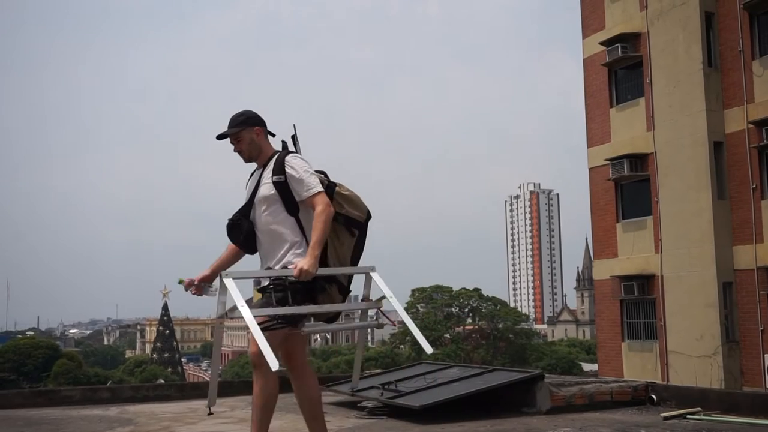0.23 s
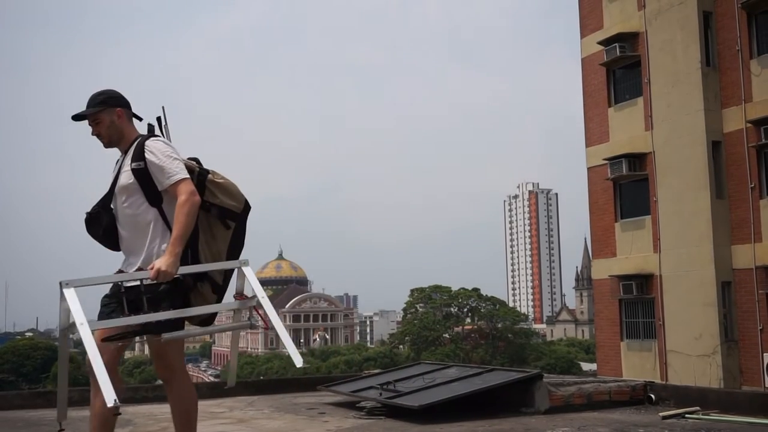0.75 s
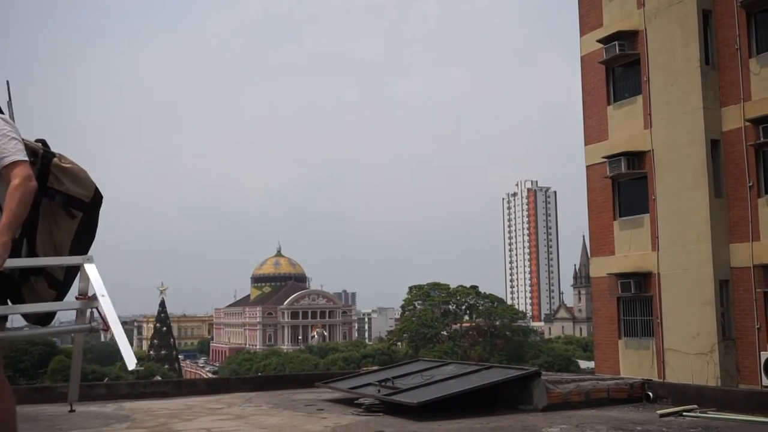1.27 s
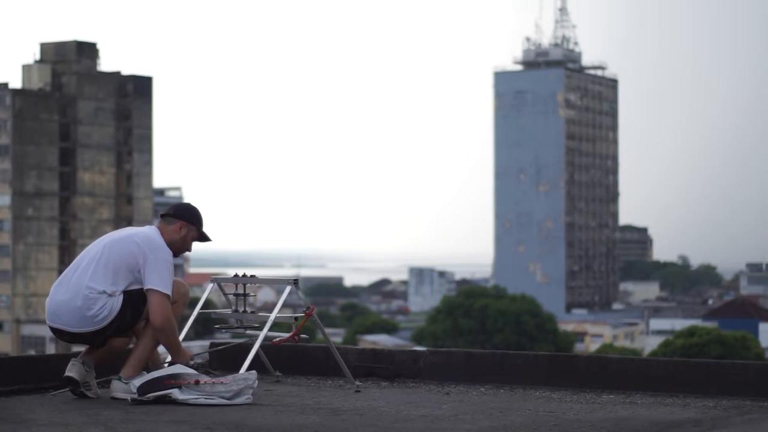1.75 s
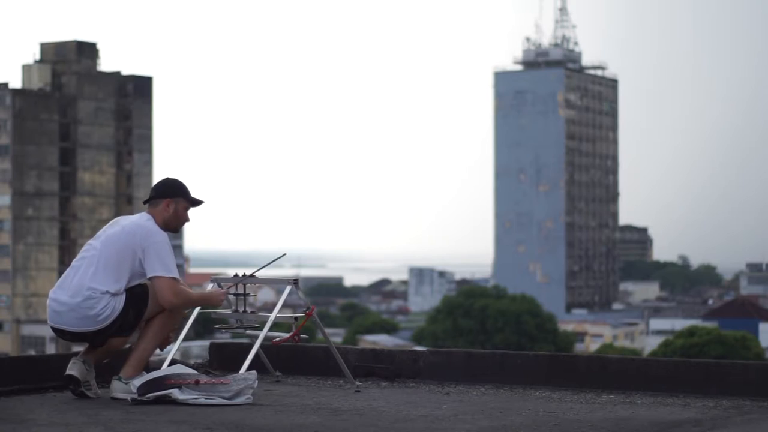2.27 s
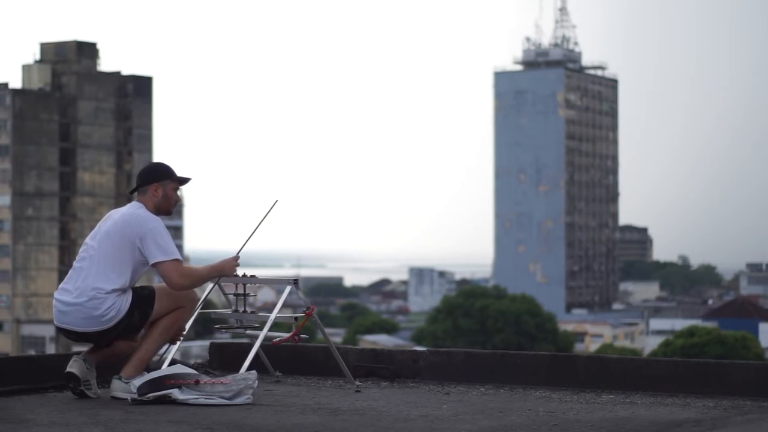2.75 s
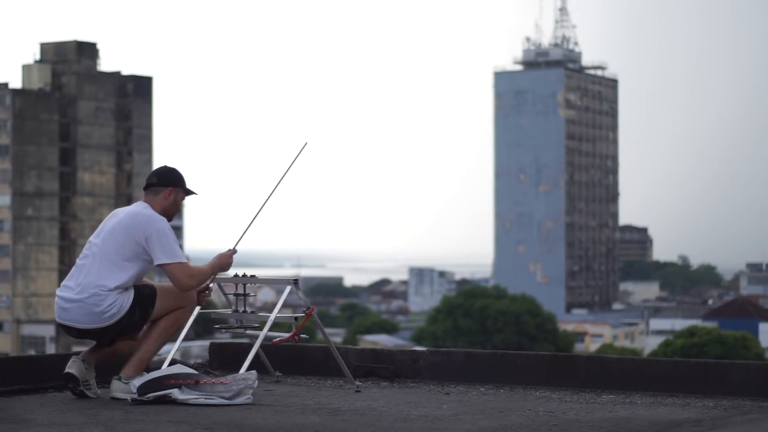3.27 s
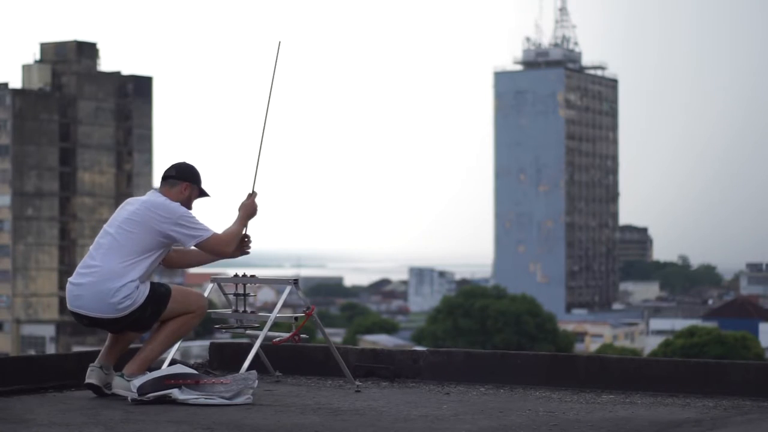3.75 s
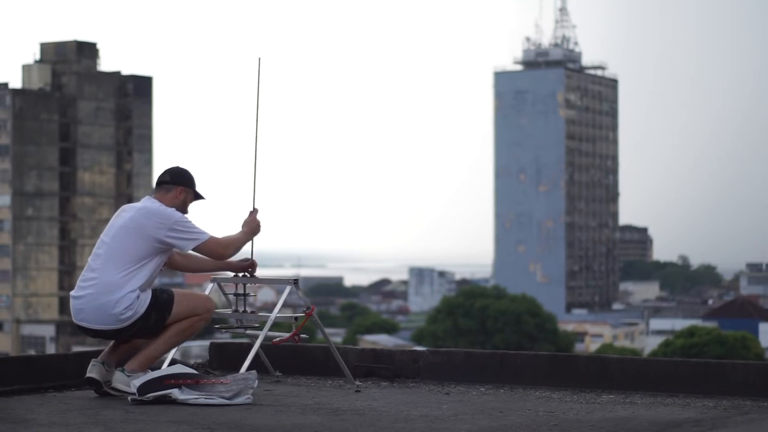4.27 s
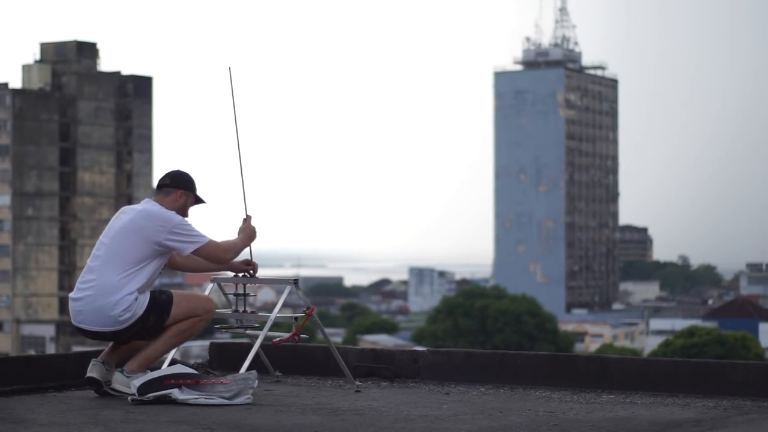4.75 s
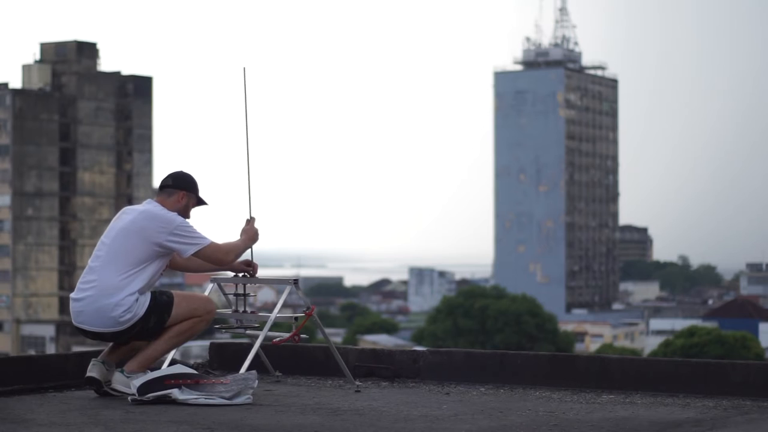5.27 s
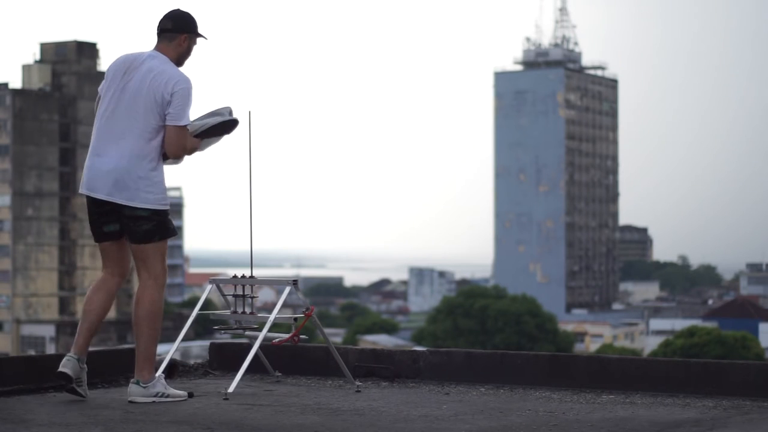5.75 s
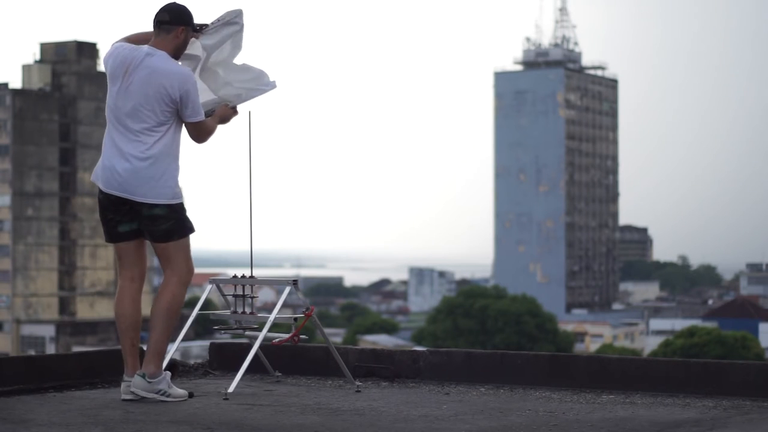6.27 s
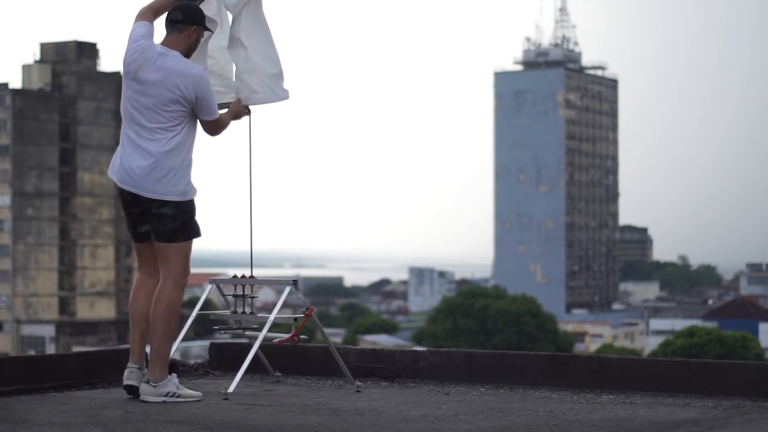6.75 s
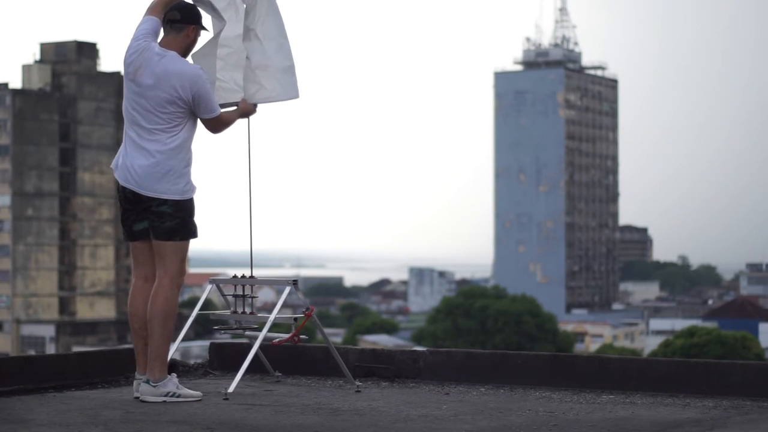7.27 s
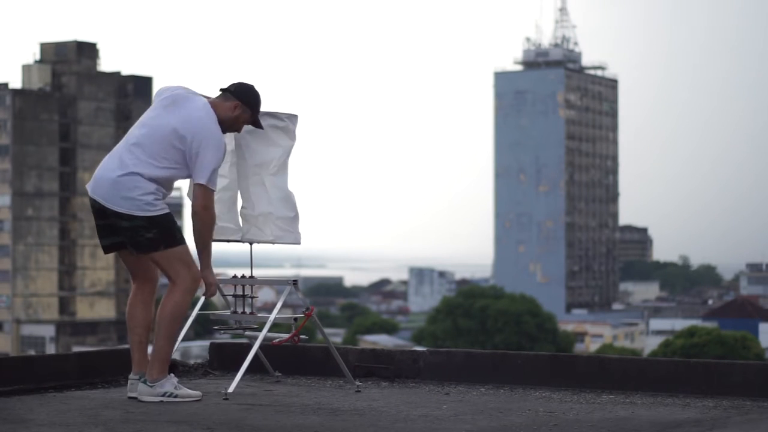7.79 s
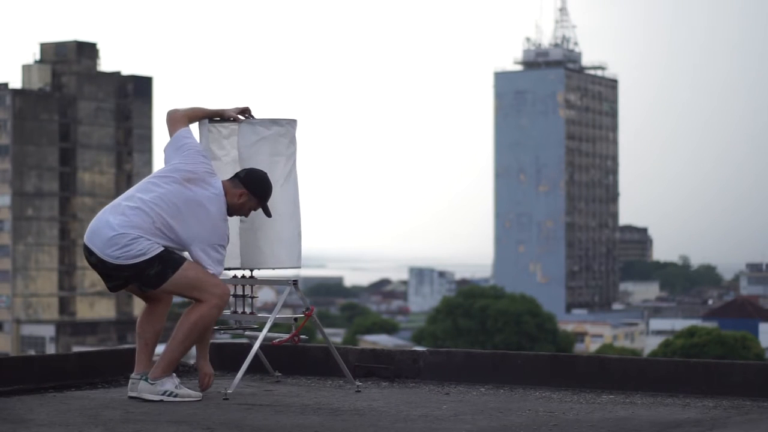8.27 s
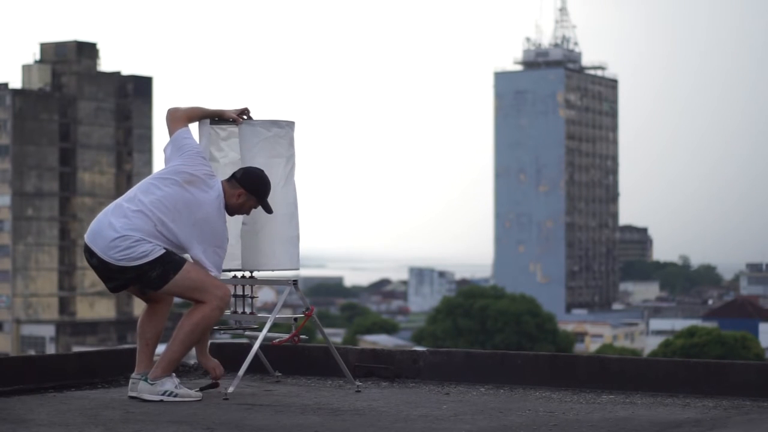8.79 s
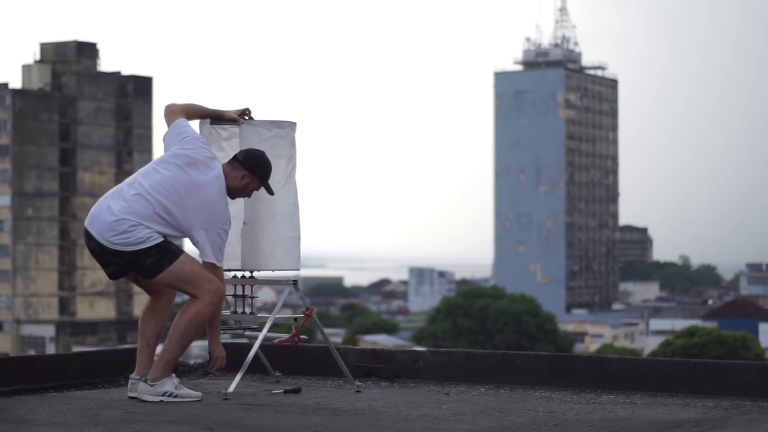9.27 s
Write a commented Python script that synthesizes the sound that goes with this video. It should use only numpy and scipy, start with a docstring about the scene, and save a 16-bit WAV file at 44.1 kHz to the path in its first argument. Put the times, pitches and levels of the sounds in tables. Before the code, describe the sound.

Rooftop ambience over a busy street: bus pulling away, heavy engine idling, soft tyre wash, while handled gear ticks, knocks and jingles nearby.

```python
"""City traffic from a rooftop

Two microphones set apart hear deep rumble, a bus pulling away, a heavy engine idling and revving, a low hum,
passing tyres and rubbing brakes. Close by, handled gear ticks, scuffs, knocks and jingles; thin tones come and go.
Engines are sums of sine waves; traffic, brakes and scuffs are shaped noise. Ticks are dying noise bursts,
and knocked frames and struck metal ring at their own pitches."""
import sys
import numpy as np
from scipy import signal
from scipy.fft import rfft, irfft, next_fast_len
from scipy.io import wavfile
from scipy.ndimage import uniform_filter1d

SR = 44100
rng = np.random.default_rng(int(sys.argv[2]) if len(sys.argv) > 2 else 0)


def transcribe(u):
    """Save the signal u as a 16-bit wav file named by the first command-line argument.

    u: samples, shape (n,) or (channels, n), limited to [-1, 1]; the rate is SR.
    q: integer samples, one column per channel.
    """
    v = np.clip(np.atleast_2d(u).T, -1, 1)
    q = np.round(v * 32767).astype(np.int16)
    wavfile.write(sys.argv[1], SR, q)


N = 420273
TIME = np.arange(N) / SR
# Every table of a noise's spectrum gives only its shape: the noise is scaled to rms 1 afterwards.


# bus pulling away through its gears: (time [s], firing rate [Hz], level [dB])
BUS = [(.25, 46.47, -42), (.45, 56.5, -30.5), (.68, 64.8, -32), (.89, 74.45, -24), (1.05, 79.4, -29.5),
       (1.3, 83.6, -33), (1.42, 76.35, -24.5), (1.75, 84.55, -30.5), (1.9, 88.7, -23.5), (2.4, 93, -30),
       (2.58, 92.8, -37.5), (2.8, 93.2, -25.5), (2.97, 95, -36.5), (3.13, 94.8, -27), (3.43, 94.2, -35.5),
       (3.58, 91, -27.5), (3.8, 91.05, -45), (4.0, 90, -31.5)]


def bus():
    """The firing rate climbs through the gears; a faint second multiple grows while the engine speeds up."""
    hz, first_db, gate = in_time(BUS)
    second_db = first_db - 25 + 0.3521 * speeding_up(hz)     # 0.3521 dB for each Hz per second
    return gate * engine(hz, (1, 2), (first_db, second_db))


# heavy engine: (time [s], firing rate [Hz], level [dB], level of the second multiple [dB])
LORRY = [(0, 27.9, -34.5, -42), (.6, 27.87, -30, -31.5), (1.2, 28.1, -31.5, -47), (3.0, 27.91, -31, -34.5),
         (3.65, 26, -30, -31.5), (4.2, 25.92, -21.5, -29), (4.8, 26.32, -25, -28.5),
         (5.2, 27.65, -27.5, -27.5), (5.9, 31, -24, -32), (6.15, 30.9, -23.5, -36), (6.35, 29.69, -39, -34),
         (7.0, 28.28, -29, -30.5), (7.3, 28.61, -38, -26), (7.75, 28.4, -28.5, -26),
         (8.1, 28.1, -29, -36.5), (8.7, 27.92, -30.5, -36), (9.1, 27.78, -33.5, -30),
         (9.53, 27.8, -31, -36)]


def lorry():
    """A heavy engine idles and revs; its sixth multiple lies under the second and grows while it speeds up."""
    hz, first_db, second_db, _ = in_time(LORRY)
    sixth_db = second_db - 19.5 + 1.5 * speeding_up(hz)     # 1.5 dB for each Hz per second
    return engine(hz, (1, 2, 6), (first_db, second_db, sixth_db))


THROB_DB, THROB_HZ = 1.8, 3.0     # how strongly and about how often an engine multiple swells


def engine(hz, multiples, levels_db):
    """Low multiples of the firing rate carry furthest, as near sines; uneven running lets the phase wander."""
    turns = 2 * np.pi * np.cumsum(hz) / SR + 0.0024 * wander(count=1)[0]
    out = np.zeros(N)
    for k, level_db in zip(multiples, levels_db):
        throb = narrow_noise(THROB_HZ, THROB_HZ)[0]     # swells and sinks at random on its way up
        gain = np.sqrt(2) * from_db(level_db + THROB_DB * throb)
        out += gain * np.sin(k * turns + rng.uniform(0, 2 * np.pi))
    return out


def speeding_up(hz):
    """Rise of the firing rate in Hz per second, smoothed; slowing down counts as none."""
    return np.clip(uniform_filter1d(np.gradient(hz) * SR, size=SR // 5), 0, None)


# loudness of the low hum: (time [s], level [dB])
HUM = [(0, -35.5), (1.4, -42.5), (3.3, -27), (4.0, -38), (5.1, -37.5), (5.5, -27), (6.4, -29), (8.2, -41.5),
       (9.25, -23.5), (9.53, -44)]


def hum():
    """Noise through a narrow low resonance makes a wavering hum."""
    return from_db(in_time(HUM)[0]) * narrow_noise(hz=40.62, width_hz=4.8)[0]


def engines():
    """Two engines and a hum; the bass reaches both microphones almost alike, 1 dB stronger on the left."""
    return (bus() + lorry() + hum()) * from_db([[.5], [-.5]])


# deep rumble, its spectrum: (frequency [Hz], level per Hz [dB])
RUMBLE = [(12, -29), (22, -3), (30, -3), (40, -3.5), (50, -1.5), (62, 3), (80, -4.5), (98, -8), (112, -11),
          (160, -50.5)]
# rise and fall of the rumble: (time [s], level [dB])
RUMBLE_LEVEL = [(0, -32.5), (.6, -28), (1.4, -31), (2.1, -27), (2.9, -30), (4.3, -29), (5.8, -31),
                (6.5, -27.5), (8.3, -30), (9.0, -30), (9.53, -26.5)]


def rumble():
    """Deep noise from all round rises and falls."""
    return from_db(in_time(RUMBLE_LEVEL)[0]) * coloured(RUMBLE)


# spectra of engine drone, tyre roar and tyre hiss: (frequency [Hz], level per Hz [dB])
DRONE = [(53, -29), (90, -8.5), (146, -4), (433, -16.5), (700, -29), (910, -62), (1540, -120)]
TYRES = [(300, -20), (600, -3), (900, -2), (1220, -1), (1500, -7.5), (1800, -25.5), (2400, -24)]
HISS = [(1300, -4), (1700, -5), (2300, -7), (3000, -14), (5000, -17), (6000, -27), (10000, -37.5),
        (13500, -62)]
# peaks added to the hiss: (frequency [Hz], width [Hz], height [dB])
HISS_PEAKS = [(2086, 450, 4.5), (3850, 270, 3), (5200, 89, -1.5)]


def passing_vehicles():
    """Drone and tyre noise swell as vehicles pass, coming partly from a street on the right."""
    drone, roar, hiss = passing_gains()
    low = drone * coloured(DRONE, side_share=0.41)
    tyres = roar * coloured(TYRES, side_share=0.56)
    return low + tyres + hiss * coloured(HISS, HISS_PEAKS, side_share=0.26)


# vehicles pass in the street: (time when closest [s], approach [s], departure [s],
#     engine drone level [dB], tyre roar level [dB], tyre hiss level [dB]); levels are for the closest moment
PASSES = [(0.1, .5, 0.74, -50.5, -61, -57), (5.15, 0.71, .4, -38.5, -44, -44.5),
          (6.6, 1, 0.86, -42, -50.5, -55), (8.7, 0.48, 1.4, -38.5, -43.5, -44)]
# loss as a power of 1 / distance: the treble goes first
DRONE_FADE, ROAR_FADE, HISS_FADE = 0.54, 0.94, 1.4


def passing_gains():
    """Each vehicle's distance grows before and after its closest moment; the powers of all vehicles add."""
    fades = np.array([[DRONE_FADE], [ROAR_FADE], [HISS_FADE]])
    power = 0
    for s, approach_s, departure_s, *levels_db in PASSES:
        pace_s = np.where(TIME < s, approach_s, departure_s)
        distance = np.hypot(1, (TIME - s) / pace_s)     # 1 when closest
        power = power + (from_db(levels_db)[:, None] / distance ** fades) ** 2
    return np.sqrt(power)


# brakes rub and a gear whines: (time [s], length [s], gear whine level [dB], brake whistle level [dB])
BRAKES = [(4.55, 1.0, -58, -75), (8.1, 1.08, -52, -68.5), (9.0, .9, -52, -72)]
# gear whine and brake whistle: (frequency [Hz], width [Hz])
BRAKE_BANDS = [(2170, 150), (7050, 190)]


def brakes():
    """Noise twice through each of two narrow resonances, louder on the right."""
    low, whistle = [narrow_noise(hz, width_hz, count=2) for hz, width_hz in BRAKE_BANDS]
    out = np.zeros((2, N))
    for s, length, low_db, whistle_db in BRAKES:
        out += stroke(s, length) * (from_db(low_db) * low + from_db(whistle_db) * whistle)
    return out * from_db([[-1.4], [1.4]])


# ticks of handled gear: (time [s], peak level before panning [dB], pitch of the knocked part [Hz],
#     left over right [dB])
TICKS = [(0.571, -44, 6000, -2), (0.6557, -47, 5000, -2), (.971, -37.5, 4200, 9), (1.0793, -32, 3100, .1),
         (1.086, -42, 5000, .1), (1.173, -40, 3200, -5), (1.1807, -43, 6500, -2), (1.678, -46, 4570, -.4),
         (1.746, -44, 3800, .9), (1.7932, -45, 5490, -3), (1.821, -48, 4800, 2), (3.5808, -25, 3073, 6),
         (7.051, -45, 9030, 5), (9.263, -40, 9000, 2)]
TICK_WIDTH, TICK_T60_S = 1.0, .005     # resonance width as a share of pitch; time for the burst to fall 60 dB


def ticks():
    """A tick is a dying burst of noise in the resonance of the knocked part."""
    out, t = np.zeros((2, N)), np.arange(1500) / SR
    for s, db, hz, pan_db in TICKS:
        noise = rng.standard_normal(len(t))
        noise[0] = 5.0     # the contact itself
        burst = noise * from_db(-60 * t / TICK_T60_S)
        tick = resonance(resonance(burst, hz, TICK_WIDTH * hz), hz, 1.1 * hz)
        damping = signal.butter(2, 1.5 * hz, fs=SR, output="sos")     # the far treble is damped
        tick = signal.sosfilt(damping, tick)
        add(out, s, from_db(db) * tick / np.abs(tick).max(), pan_db)
    return out


# scuffs of cloth or soles: (time [s], length [s], level [dB], left over right [dB])
SCUFFS = [(0.46, 0.023, -54, -1), (0.51, 0.028, -55, 0), (1.072, 0.023, -49, 0), (1.675, 0.021, -56, 0),
          (3.563, 0.043, -42.5, 3), (3.632, 0.026, -48.5, 5), (9.32, 0.0087, -45, 2)]
# their spectrum: (frequency [Hz], level per Hz [dB])
SCUFF = [(1200, 3), (2500, 10), (4000, 2), (6000, 1), (9000, -8.5), (13500, -7), (14600, -28)]


def scuffs():
    """A scuff is a short swell of bright noise."""
    out, rub = np.zeros((2, N)), coloured(SCUFF)
    for s, length, db, pan_db in SCUFFS:
        out += from_db(db + pan_db * np.array([[.5], [-.5]])) * stroke(s, length) * rub
    return out


# dull knocks on a hollow frame: (time [s], peak level [dB], frequency [Hz], width [Hz])
KNOCKS = [(1.1735, -36, 1280, 330), (1.181, -29.5, 1200, 420), (1.7877, -26.5, 1010, 620),
          (1.7917, -34.5, 2820, 500), (1.7932, -34, 734, 500), (1.8, -55, 2510, 600),
          (3.635, -42, 2300, 400), (3.646, -41, 2650, 400), (3.650, -43, 2423, 400),
          (7.158, -33, 1499, 593.5)]


def knocks():
    """A soft contact twice through the frame's resonance: a few rounded cycles."""
    out, contact = np.zeros((2, N)), np.eye(1, 1200)[0]
    for s, db, hz, width_hz in KNOCKS:
        knock = resonance(resonance(contact, hz, width_hz), hz, width_hz)
        add(out, s, from_db(db) * knock / np.abs(knock).max(), 0)
    return out


# small metal parts clink together: (time [s], strength [dB], pitch of the part struck hardest [Hz])
CLINKS = [(5.889, -51, 9750), (7.107, -32, 4800), (7.1085, -31, 3440), (7.110, -30, 8200),
          (7.112, -32, 13200), (7.145, -23, 11500), (7.157, -32, 7900), (7.158, -33, 4080),
          (7.163, -34, 2850), (7.170, -35, 14000), (7.212, -47, 11700), (7.257, -44, 12700),
          (7.312, -54, 9870), (8.449, -54, 14630), (9.396, -41, 9800), (9.407, -33, 4050),
          (9.428, -38, 13050), (9.444, -35, 3500), (9.447, -31, 4200), (9.448, -31, 11660),
          (9.449, -31, 7700), (9.457, -36, 13500), (9.476, -50, 11500)]
# ringing pitches (modes) of the parts: (frequency [Hz])
KEYS_HZ = [2850, 3440, 4080, 4800, 5500, 6350, 7080, 7596, 7960, 8860, 9790, 10670, 11660, 12720, 13780,
           14727]
# how each mode rings: (level [dB], time to fall 60 dB [s])
KEYS = [(-11, 0.2), (2.5, 0.053), (1.5, 0.086), (5, 0.051), (3.5, 0.037), (1, 0.021), (-10, 0.065),
        (-9, .07), (-7.5, 0.15), (-10, 0.053), (-7, 0.091), (-6.5, 0.063), (-4.5, 0.055), (-5, 0.03),
        (-5, .06), (-6, .05)]
AWAY_DB_PER_OCTAVE, AWAY_MOST_DB = 40, 24     # modes lose level with distance from the struck part


def clinks():
    """Each clink rings all the metal modes; those near the struck part speak loudest."""
    out, (mode_db, t60s) = np.zeros((2, N)), np.transpose(KEYS)
    for s, db, struck_hz in CLINKS:
        octaves = np.abs(np.log2(np.array(KEYS_HZ) / struck_hz))
        away_db = np.minimum(AWAY_DB_PER_OCTAVE * octaves, AWAY_MOST_DB)
        levels_db = db - 4 + mode_db - away_db + rng.normal(0, 2.5, len(t60s))
        struck(out, s, KEYS_HZ, levels_db, t60s, rise_s=.0005, pan_db=-4.6)
    return out


# rustle of many tiny metal contacts: (frequency [Hz], level per Hz [dB])
RUSTLE = [(1500, 8), (3000, 10), (5000, -11), (6300, -13), (8000, -15), (12000, 0.5), (15000, -11)]
CHATTER_PER_S, CHATTER_DB, CHATTER_T60_S = 700, -20.5, 0.18     # contacts, level under a clink, settling time


def chatter():
    """After each clink the parts chatter on, fainter, and settle: random clicks ring the modes over a rustle."""
    out, power = np.zeros((2, N)), np.zeros(N)
    for s, db, _ in CLINKS:
        settling_db = db + CHATTER_DB - 60 * np.abs(TIME - s) / CHATTER_T60_S
        power += (TIME > s) * from_db(settling_db) ** 2
    force = np.sqrt(power)
    for hz, (db, t60) in zip(KEYS_HZ, KEYS):
        contacts = rng.random(N) < CHATTER_PER_S / SR
        clicks = contacts * rng.standard_normal(N) * force + 1e-18
        width_hz = 5.6 / t60     # wide enough to ring shorter than a clink does
        ringing = from_db(db) * resonance(clicks, hz, width_hz) * SR / (2 * np.pi * width_hz)
        add(out, 0, ringing, -4.5 + rng.standard_normal(), lag=4)
    return out + force * coloured(RUSTLE)


# a thin ring is struck and sings on: (time [s], strength [dB])
RING_HITS = [(9.302, -60), (9.326, -42)]
# its modes, where close pairs beat: (frequency [Hz])
RING_HZ = [7935, 10936, 10971, 11427, 15036, 15089]
# how each mode rings: (level [dB], time to fall 60 dB [s])
RING = [(-13, .5), (0, .35), (-4, .35), (-8, .2), (1.5, .22), (-1.5, .22)]


def thin_ring():
    """A struck ring sings with longer, softer-starting modes than the clinks."""
    out, (mode_db, t60s) = np.zeros((2, N)), np.transpose(RING)
    for s, db in RING_HITS:
        struck(out, s, RING_HZ, db + mode_db, t60s, rise_s=.003, pan_db=-1.0)
    return out


def struck(out, s, modes_hz, levels_db, t60s, rise_s, pan_db):
    """One contact rings every mode for up to a quarter second, each leaning to a side of its own."""
    t = np.arange(SR // 4) / SR
    for hz, db, t60 in zip(modes_hz, levels_db, t60s):
        shape = from_db(db - 60 * t / t60) * (1 - np.exp(-t / rise_s))
        side_db = pan_db + 3.0 * rng.standard_normal()
        add(out, s, shape * np.sin(2 * np.pi * hz * t), side_db, lag=4)


# faint thin tones that come and go: (time [s], length [s], pitch [Hz], rise [Hz per s], peak level [dB],
#     waver [radians per step of the walk])
TONES = [(1.28, 0.21, 4750, 0, -68, .03), (2.08, 0.5, 548, 50, -54, 0.003),
         (2.75, 0.22, 4750, 0, -66, 0.0282), (3.547, 0.012, 5900, 0, -56, 0.02),
         (3.564, 0.022, 5900, 0, -49, 0.01), (3.596, .015, 5900, 0, -58, .02)]


def thin_tones():
    """Sines whose phase wanders."""
    walk, out = wander(count=2), np.zeros((2, N))
    for s, length, hz, rise, db, waver in TONES:
        t = TIME - s
        phase = 2 * np.pi * (hz + rise * t / 2) * t + waver * walk
        out += from_db(db) * stroke(s, length) * np.sin(phase)
    return out


# far city wash, its spectrum: (frequency [Hz], level per Hz [dB])
WASH = [(210, 0), (350, -9.5), (440, -7), (490, -3), (562, -2.5), (626, -3.5), (729, -3), (1120, -3.5),
        (1520, -7.5), (2330, -11), (2930, -18), (4780, -23.5), (5910, -31.5), (9790, -33), (13500, -35.5)]


def far_wash():
    """Steady noise of the far city, mostly from all round."""
    return from_db(-45.5) * coloured(WASH, side_share=0.11)


# likeness of left and right in sound from all round: (frequency [Hz], correlation, 1 is identical)
LIKENESS = [(60, 0.82), (99, 1), (160, -0.04), (270, 0.5), (450, -0.21), (740, -0.11), (1220, 0.027),
            (2010, -0.054), (3330, 0.029), (5500, -0.025), (9080, -0.0087), (15000, 0.073)]
# right microphone over left: (frequency [Hz], level [dB])
RIGHT_LEAN = [(1000, 0), (2400, 1.2), (4400, 3), (8000, 0.5)]
PAIR_LAG_S = 35 / SR     # travel time across the pair


def coloured(spectrum, peaks=(), side_share=0.):
    """Stereo noise of a given spectrum; a share comes from the right end of the pair, the rest from all round."""
    size = next_fast_len(N)
    hz = np.arange(size // 2 + 1) * SR / size
    mid, side, street = rfft(rng.standard_normal((3, size)))
    ends = (hz > spectrum[0][0]) & (hz < spectrum[-1][0])
    level_db = at_hz(spectrum, hz)
    for peak_hz, width_hz, db in peaks:
        level_db = level_db + db / (1 + (2 * (hz - peak_hz) / width_hz) ** 2)
    alike = np.clip(at_hz(LIKENESS, hz), -1, 1)
    around = (np.sqrt(1 + alike) * mid + np.sqrt(1 - alike) * side * [[1], [-1]]) / np.sqrt(2)
    # sound from the right reaches the left microphone late
    one_side = street * np.exp(-2j * np.pi * hz * PAIR_LAG_S * np.array([[1], [0]]))
    share = np.clip(side_share, 0, 1) / (1 + (hz / 2000) ** 2)     # direction blurs in the treble
    both = np.sqrt(1 - share) * around + np.sqrt(share) * one_side
    lean = from_db(at_hz(RIGHT_LEAN, hz) * np.array([[-.5], [.5]]))
    return rms_one(irfft(both * lean * ends * from_db(level_db), size)[:, :N])


def resonance(x, hz, width_hz):
    """Two-pole peak of gain 1."""
    r = np.exp(-np.pi * width_hz / SR)
    feedback = [1, -2 * r * np.cos(2 * np.pi * hz / SR), r * r]
    return signal.lfilter((1 - r * r) / 2 * np.array([1, 0, -1]), feedback, x)


def narrow_noise(hz, width_hz, count=1):
    """Noise twice through one resonance, at rms 1; a first second is dropped so that it starts at full swing."""
    noise = rng.standard_normal((count, N + SR))
    return rms_one(resonance(resonance(noise, hz, width_hz), hz, width_hz)[:, SR:])


def wander(count):
    """Slow random walks with the fast jitter smoothed away."""
    walk = np.cumsum(rng.standard_normal((count, N)), axis=1)
    return uniform_filter1d(uniform_filter1d(walk, size=200), size=150)


def stroke(s, length):
    """A rounded swell that starts at s and lasts for length, both in seconds."""
    return np.sin(np.pi * np.clip((TIME - s) / length, 0, 1)) ** .8


def from_db(db):
    """Decibels to gain."""
    return 10 ** (np.asarray(db) / 20)


def rms_one(x):
    """Scale to rms 1."""
    return x / np.sqrt(np.mean(x ** 2) + 1e-20)


def in_time(rows):
    """Columns of a curve at every sample, and a gate that fades in and out at its ends."""
    s, *columns = np.transpose(rows)
    fade = (s[-1] - s[0]) / 40
    gate = np.clip(np.minimum(TIME - s[0] + fade, s[-1] + fade - TIME) / fade, 0, 1)
    return [np.interp(TIME, s, c) for c in columns] + [gate]


def at_hz(points, hz):
    """Read a curve over frequency, straight lines on log frequency."""
    points = np.array(points)
    return np.interp(np.log(hz + 1), np.log(points[:, 0] + 1), points[:, 1])


def add(out, s, sound, pan_db, lag=0):
    """Lay a short sound into both channels, left over right by pan_db; left is late by lag samples."""
    for channel, (shift, sign) in enumerate([(lag, .5), (0, -.5)]):
        at = round(s * SR) + shift
        out[channel, at:at + len(sound)] += (sound * from_db(sign * pan_db))[:N - at]


def scene():
    """Street below, handling close by."""
    street = engines() + rumble() + passing_vehicles() + brakes() + far_wash()
    handling = ticks() + scuffs() + knocks()
    jingle = clinks() + chatter() + thin_ring()
    return street + handling + jingle + thin_tones()


def record(dry):
    """A steep low-pass cuts the top above 15.7 kHz."""
    return signal.sosfilt(signal.ellip(10, .5, 70, 15700, fs=SR, output="sos"), dry)


dry = scene()
out = record(dry)
transcribe(out)
```